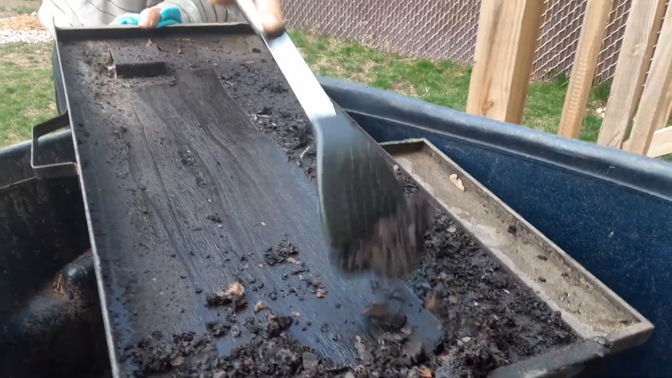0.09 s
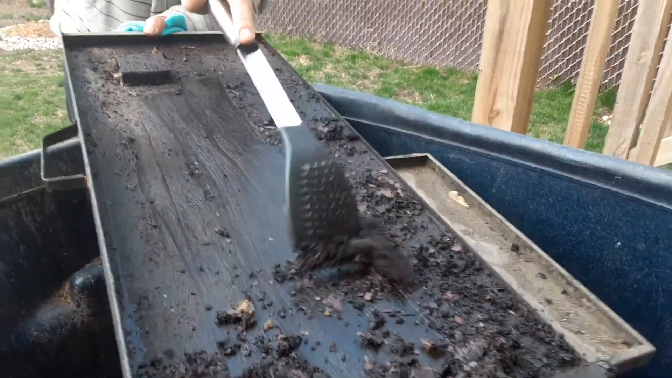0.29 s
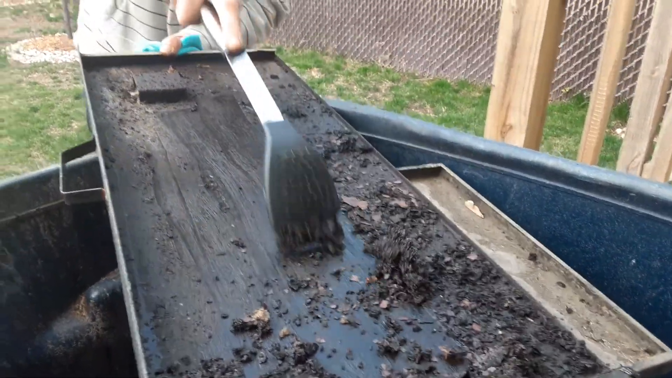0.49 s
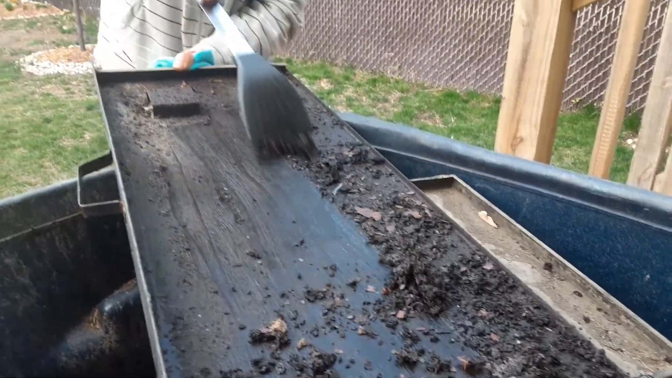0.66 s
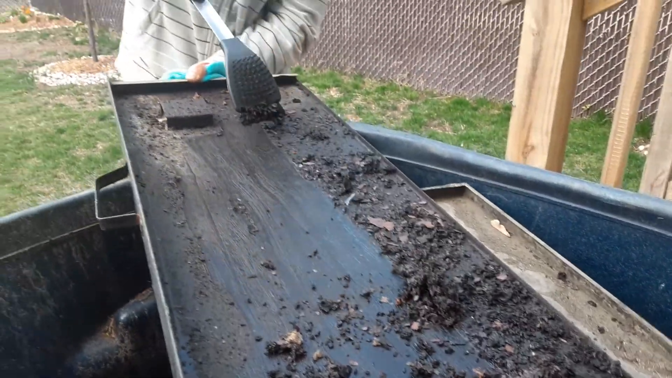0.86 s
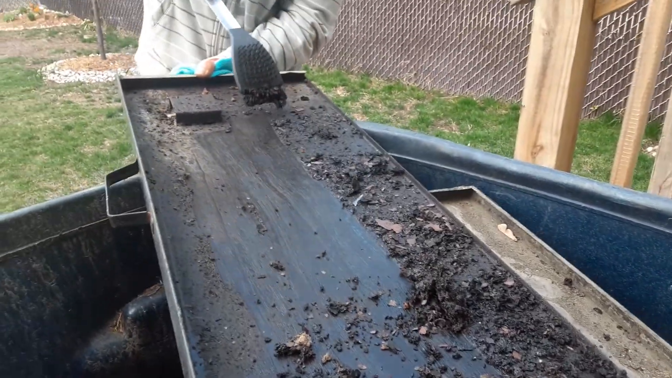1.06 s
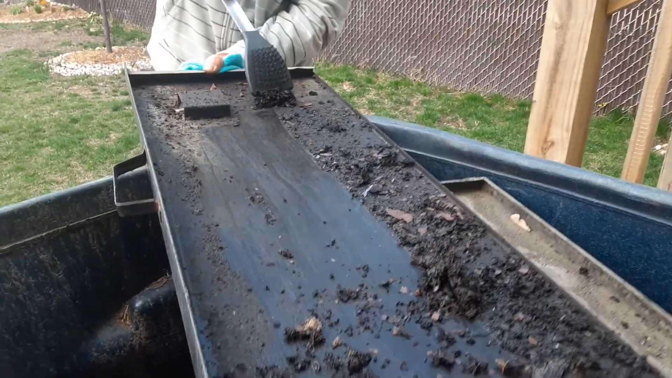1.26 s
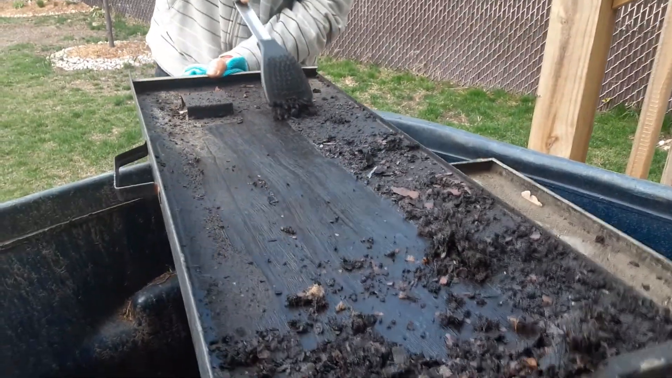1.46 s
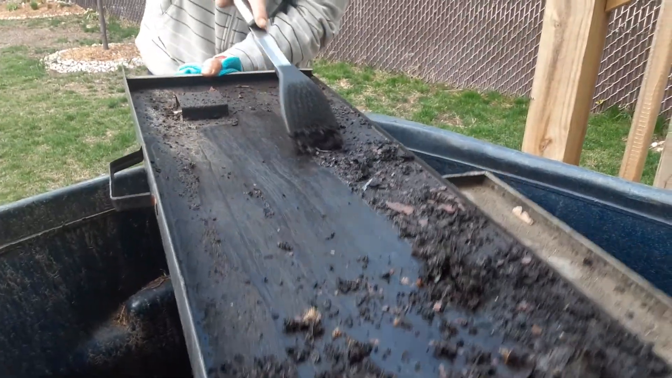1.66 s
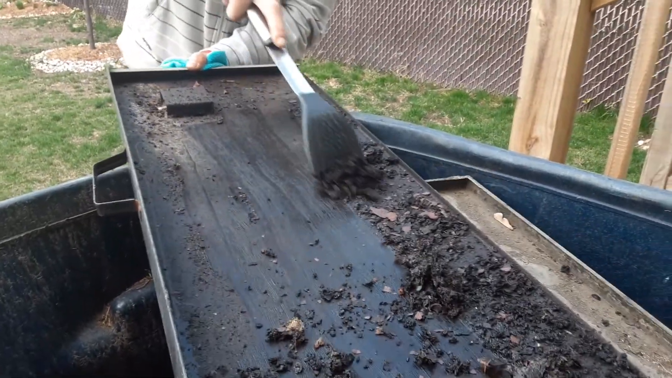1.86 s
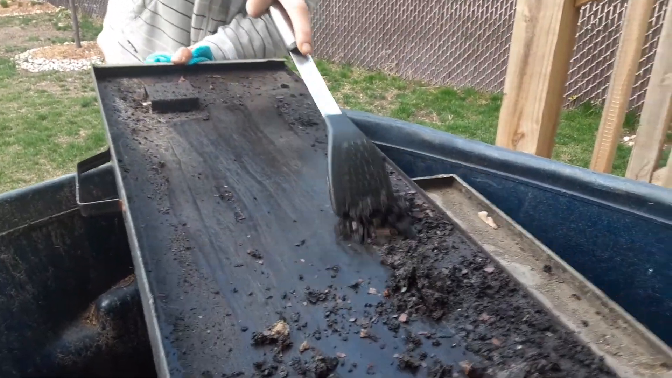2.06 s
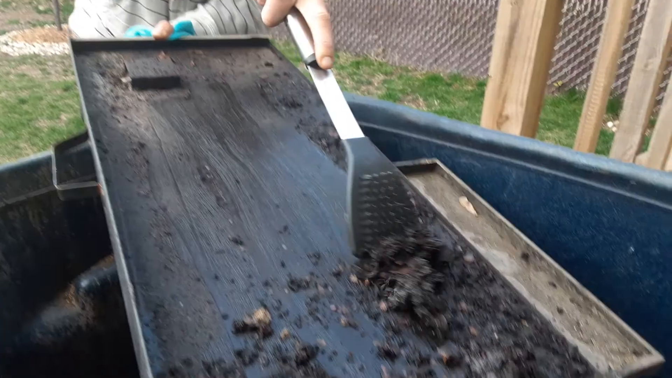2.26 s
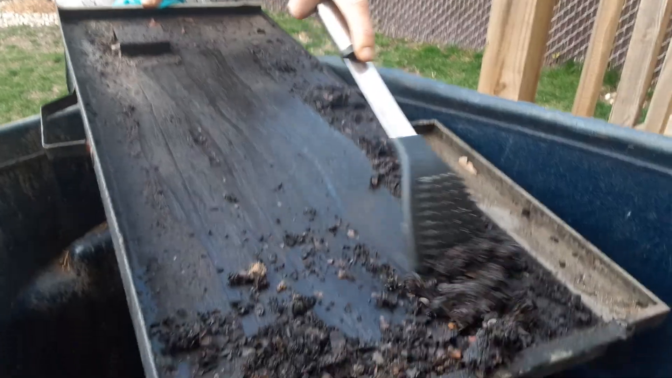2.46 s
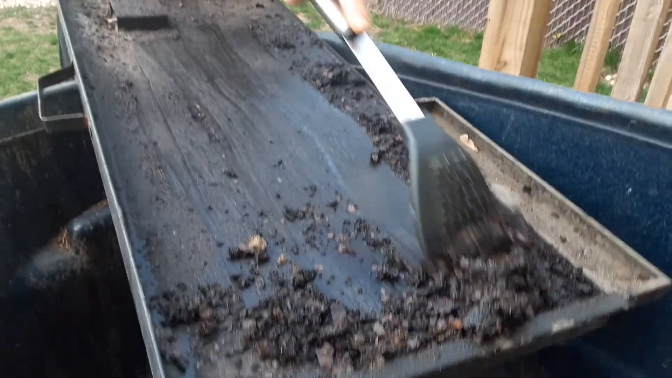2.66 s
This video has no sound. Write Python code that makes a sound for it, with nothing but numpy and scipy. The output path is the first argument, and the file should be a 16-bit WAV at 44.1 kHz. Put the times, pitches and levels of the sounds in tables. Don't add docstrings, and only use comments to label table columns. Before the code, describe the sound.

Metal tray scraping, close up outdoors: a short flick ends in a loud hollow clatter, crumbs patter and fade, then a harsh gritty drag grows toward the microphone, with ticks, dull knocks and sliding crumbs.

```python
import sys
import numpy as np
from scipy import signal
from scipy.fft import rfft, irfft, next_fast_len
from scipy.io import wavfile
from scipy.ndimage import uniform_filter1d, map_coordinates

SR = 44100
rng = np.random.default_rng(int(sys.argv[2]) if len(sys.argv) > 2 else 0)


def unload_wav(signal):
    wavfile.write(
        sys.argv[1],
        SR,
        np.round(np.clip(np.atleast_2d(signal).T, -1, 1) * 32767).astype(np.int16),
    )


def gain_from_db(level_db):
    decades = np.asarray(level_db, float) / 20
    return 10 ** decades


N = 119070
TIME = np.arange(N) / SR


def unit(x):
    return x / np.sqrt(np.mean(x ** 2) + 1e-20)


def along(points, hz):
    f, value = np.transpose(points)
    return np.interp(np.log(hz + 1), np.log(f + 1), value)


def filtered(x, response):
    m = next_fast_len(x.shape[-1] + SR // 4)
    spectrum = rfft(x, m) * response(np.fft.rfftfreq(m, 1 / SR))
    return irfft(spectrum, m)[..., :x.shape[-1]]


def wobble(rate):
    knots = rng.standard_normal(int(N * rate / SR) + 4)
    return map_coordinates(knots, [np.arange(N) * rate / SR])


def grains(rate, size_db, bed):
    hit = rng.random((2, N)) < rate / SR
    size = rng.standard_normal(N) * gain_from_db(size_db * rng.exponential(size=N))
    return unit(bed * rng.standard_normal((2, N)) + unit(hit * size))


def bursts(rows):
    total = np.zeros(N)
    for start, db, rise, t60 in rows:
        since = TIME - start
        fade_db = -60 * np.maximum(since - rise, 0) / t60
        total += gain_from_db(db + fade_db) * np.clip(since / rise, 0, 1)
    return total


# frequency in Hz, likeness from 0 to 1.
LIKENESS = [(60, .4), (130, .55), (290, .8), (640, .75), (1410, .15), (3100, 0), (15000, 0)]


def spread(pair, spectrum):
    def response(hz):
        turn = np.arccos(np.clip(along(LIKENESS, hz), -1, 1)) / 2
        return gain_from_db(along(spectrum, hz)) * [np.cos(turn), np.sin(turn)]

    mid, side = filtered(pair, response)
    return np.array([mid + side, mid - side])


# frequency in Hz, level in dB, time to fade by 60 dB in seconds.
FREE_TONES = [(80, -6, .55), (189, -5, .3), (212, -1, .33), (229, 2, .36), (307, 5, .36), (431, -3, .36),
              (467, -2, .36), (548, -4, .32), (615, -8, .36), (724, -6, .36), (794, -9, .33),
              (850, -11, .3), (992, -13, .3), (1216, -17, .2)]
# frequency in Hz, time to fade by 60 dB in seconds.
RING_TIME = [(60, 1), (300, 0.48), (1000, 0.44), (3000, 0.4), (10000, 0.11)]
# frequency in Hz, level in dB per Hz.
BANG_COLOUR = [(45, -43), (80, -8.5), (125, -16.5), (230, -4), (330, -5), (550, -6), (1000, -9),
               (2000, -27), (6000, -17)]


def tray(spectrum, share, clear_db, tones=FREE_TONES):
    length = SR // 2
    hz, t, noise = signal.stft(rng.standard_normal((2, length)), SR, nperseg=256)
    fading = gain_from_db(-60 * t / (share * along(RING_TIME, hz)[:, None]))
    dense = signal.istft(noise * fading, SR, nperseg=256)[1][:, :length]
    t = np.arange(length) / SR
    f, db, t60 = np.transpose(tones)[:, :, None]
    level_db = db - along(BANG_COLOUR, f) + rng.normal(0, 1.93, f.shape) - 60 * t / (share * t60)
    clear = (gain_from_db(level_db) * np.sin(2 * np.pi * f * t)).sum(axis=0)
    both = dense + gain_from_db(clear_db - 23.5) * clear * [[1], [.35]]
    answer = spread(both, spectrum) * np.minimum(t / 0.0004, 1)
    return answer / np.linalg.norm(answer[0])


# frequency in Hz, level in dB per Hz.
AIR_COLOUR = [(30, -10), (80, 7.5), (135, 7.5), (340, -8.5), (830, -18), (2800, -27), (8500, -60),
              (16400, -66)]


def garden_air():
    noise = unit(spread(rng.standard_normal((2, N)), AIR_COLOUR))
    return gain_from_db(-54 + 1.5 * wobble(7.0)) * noise


# frequency in Hz, width in Hz, level in dB.
BLADE_RING = [(1710, 17, 4), (4840, 170, -11)]
# frequency in Hz, level in dB per Hz.
FAR_HISS = [(900, -8), (1500, -0.5), (2260, -3.5), (5230, -3), (8500, -11.5), (11500, -6.5), (16000, -10.5)]
# frequency in Hz, level in dB per Hz.
NEAR_HISS = [(900, -1.5), (1500, -1), (2260, -3), (5230, -1.5), (9700, -9), (11500, -4.5), (16000, -13)]


def friction_hiss(place, level):
    def ring(hz):
        return 1 + sum(gain_from_db(db) * 1j * hz * width / (centre * centre - hz * hz + 1j * hz * width)
                       for centre, width, db in BLADE_RING)

    slips = grains(2500, 2.62, bed=2.16)
    tilt = np.clip(3.0 * place, 0, 1)
    hiss = (1 - tilt) * spread(slips, FAR_HISS) + tilt * spread(slips, NEAR_HISS)
    z = signal.stft(filtered(hiss, ring), nperseg=256)[2]
    patches = uniform_filter1d(rng.standard_normal(z.shape[1:]), size=14, axis=0)
    patches = unit(uniform_filter1d(patches, size=4, axis=1))
    return unit(signal.istft(z * gain_from_db(1.5 * patches), nperseg=256)[1][:, :N]) * level


# frequency in Hz, level in dB, time to fade by 60 dB in seconds.
PRESSED_TONES = [(78.7, 1, 0.41), (202, -10, 1), (319.5, -3, 1), (468, -6, 0.99), (604.6, -9, 0.19),
                 (684, 4.5, 0.1), (801, -13, .3), (997, -2, 0.52), (1675, -24, 0.2)]
# frequency in Hz, level in dB per Hz.
FAR_DRUM = [(45, -46), (82, 1.5), (140, -8), (205, 0), (270, -7), (500, -3), (1100, -8.5), (2500, -27),
            (6000, -28.5)]
# frequency in Hz, level in dB per Hz.
NEAR_DRUM = [(45, -52), (90, -14), (210, -7), (330, -11), (480, 0), (900, -4), (1700, -14), (6000, -35)]
FAR_S, NEAR_S = 1.5, 2.5
DAMPED = 0.45


def drumming(place, level):
    spot_s = .17
    force = grains(600, 0.98, bed=1.54)[0] * level * gain_from_db(0.18 * wobble(30.2))
    out = np.zeros((2, N))
    for s in np.arange(0, N / SR + spot_s, spot_s):
        a = max(round((s - spot_s) * SR), 0)
        b = min(round((s + spot_s) * SR), N)
        near = place[min(round(s * SR), N - 1)]
        tones = np.array(PRESSED_TONES)
        tones[:, 0] *= 1 + .02 * rng.standard_normal(len(tones))
        spot = np.zeros((2, SR // 2))
        for colour, share in [(FAR_DRUM, 1 - near), (NEAR_DRUM, near)]:
            if share > 0:
                spot += np.sqrt(share) * tray(colour, DAMPED, -3.5, tones)
        push = force[a:b] * np.cos(np.pi / 2 * (TIME[a:b] - s) / spot_s)
        part = signal.fftconvolve(push[None], spot, axes=1)[:, :N - a]
        out[:, a:a + part.shape[1]] += part
    return out


# time in seconds, hiss level in dB, drumming above the hiss in dB.
FIRST_FLICK = [
    (0, -54.5, 25.5),
    (0.019, -47, 6.5),
    (.05, -58.5, 8.5),
    (.075, -61.5, 8),
    (0.101, -61.5, 8.5),
    (.16, -54, 4.5),
    (.21, -56, 6.5),
    (.228, -55, -26),
]
# time in seconds, hiss level in dB, drumming above the hiss in dB.
LONG_STROKE = [(1.291, -60, 10.5), (1.352, -39.5, 4), (1.42, -36.5, -1), (1.6, -34, -2.5),
               (1.69, -35.5, -0.5), (1.75, -33.5, -9), (1.84, -31.5, -9), (1.93, -31, -8), (2.03, -36.5, 2),
               (2.17, -33, -3), (2.27, -30, 1), (2.318, -29.5, 0), (2.36, -35, 3), (2.41, -28.5, -6.5),
               (2.441, -38.5, 2), (2.562, -39, 5), (2.61, -46, 4.5), (2.651, -61.5, 5.5)]


def blade():
    rows = np.array(FIRST_FLICK + [(.24, -54, 11), (1.22, -83.5, 16)] + LONG_STROKE + [(2.7, -63.5, 13.4)])
    hiss_db, drum_db = [np.interp(TIME, rows[:, 0], column) for column in rows.T[1:]]
    place = np.clip((TIME - FAR_S) / (NEAR_S - FAR_S), 0, 1)
    judder_db = .8 * wobble(11) + 0.62 * wobble(120) + 0.54 * np.maximum(wobble(85), 0) ** 2
    return friction_hiss(place, gain_from_db(hiss_db + judder_db)) + drumming(place, gain_from_db(hiss_db + drum_db))


# start in seconds, level in dB.
EDGE_CATCHES = [(.026, -66), (0.185, -49), (.2104, -52), (0.434, -37.5), (0.743, -40.5), (1.1636, -47.5),
                (1.306, -48), (1.327, -48), (1.344, -39), (1.369, -32), (1.384, -33), (1.408, -51),
                (1.438, -38.5), (1.471, -38), (1.48, -35), (1.514, -36), (1.526, -36.5), (1.605, -29),
                (1.64, -38), (1.947, -35.5), (2.051, -34), (2.062, -26.5), (2.109, -24), (2.138, -28),
                (2.173, -36), (2.243, -25.5), (2.477, -29), (2.671, -47)]
# frequency in Hz, level in dB per Hz.
TICK_COLOUR = [(900, -21), (1700, 4), (2500, -7), (5000, -2.5), (9000, -2), (16500, -1)]


def edge_ticks():
    rise_s, t60_s = .001, 0.065
    noise = unit(spread(grains(7100, 0.89, bed=0.67), TICK_COLOUR))
    return noise * bursts([(s, db, rise_s, t60_s) for s, db in EDGE_CATCHES])


# start in seconds, level in dB, rattle length in seconds, hardness in Hz.
BLOWS = [(.232, -16, 0.0006, 2520), (.247, -22.5, 0.019, 2500), (.262, -20, 0.024, 720),
         (0.287, -23.5, .015, 1800), (.325, -37, 0.011, 1500), (0.4348, -25.5, 0.0024, 2530),
         (0.448, -28, 0.014, 352), (0.552, -41, 0.025, 302), (0.605, -39, 0.032, 127.5),
         (1.164, -48, 0.0032, 2500), (1.178, -42.5, 0.0061, 109), (1.66, -39, 0.034, 118.4),
         (1.718, -31.5, 0.011, 830), (1.741, -37.5, .012, 450), (1.772, -34, 0.0045, 235),
         (1.798, -41, 0.065, 89), (1.957, -47, 0.049, 112), (2.204, -48.5, 0.0097, 900),
         (2.258, -27.5, 0.073, 2550), (2.552, -43, 0.025, 1520)]
# frequency in Hz, level in dB per Hz.
RIM_COLOUR = [(45, -29), (85, 0), (140, -6.5), (220, -5.5), (500, -2.5), (800, -5.5), (1700, -17),
              (6000, -31)]


def knocks():
    bounce_s, tones_db = .4, 1
    out, t = np.zeros((2, N + SR)), np.arange(SR // 5) / SR
    for s, db, length, hz in BLOWS:
        contacts = rng.standard_normal(len(t)) * np.exp(-(t / length) ** 2) / np.sqrt(length * SR)
        rattle = 0.83 * contacts + 0.86 * (t == 0)
        soft = signal.lfilter(*signal.butter(2, min(hz, 9000), fs=SR), rattle)
        if s < bounce_s:
            spot = tray(BANG_COLOUR, 1, tones_db)
        elif s < FAR_S:
            spot = tray(RIM_COLOUR, 0.78, tones_db)
        else:
            colour = RIM_COLOUR if s < (FAR_S + NEAR_S) / 2 else NEAR_DRUM
            spot = tray(colour, DAMPED, tones_db, PRESSED_TONES)
        ring = signal.fftconvolve(soft[None], spot, axes=1)
        loudness = np.sqrt(np.mean(ring[:, :SR // 20] ** 2))
        out[:, round(s * SR):][:, :ring.shape[1]] += gain_from_db(db) * ring / loudness
    return out[:, :N]


# start in seconds, level in dB, rise in seconds, time to fade by 60 dB in seconds.
SLIDES = [
    (.233, -18.5, 0.00077, 0.19),
    (.245, -32.5, 0.035, 0.21),
    (0.433, -37.5, 0.0017, 0.31),
    (.49, -49.5, 0.035, 0.13),
    (.695, -53.5, 0.0031, 0.062),
    (.93, -61, 0.0023, 0.026),
    (2.255, -27, 0.018, 0.33),
    (2.385, -31.5, 0.017, 0.21),
]
# frequency in Hz, level in dB per Hz.
CRUMB_COLOUR = [(900, -5.5), (1700, 1.5), (2450, -13), (3000, 0.5), (5280, -4), (6600, -9), (11500, -11.5),
                (16500, -21)]


def crumb_slides():
    noise = unit(spread(grains(3000, 0.66, bed=0.64), CRUMB_COLOUR))
    return noise * bursts(SLIDES) * gain_from_db(0.17 * wobble(90))


# time in seconds, level in dB.
BRUSHING = [
    (.54, -62),
    (.68, -60),
    (.8, -62),
    (.98, -94),
    (1.005, -85),
    (1.011, -63),
    (1.089, -59.5),
    (1.15, -61.5),
    (1.3, -57),
]
# frequency in Hz, level in dB per Hz.
DUST_COLOUR = [(1200, 5), (1800, 6), (3600, 2), (4800, 7), (5800, 1), (6800, -4), (16400, -10)]


def brushed_crumbs():
    level_db = np.interp(TIME, *np.transpose(BRUSHING), left=-120, right=-120) + 1.97 * wobble(40.97)
    return unit(spread(grains(2000, 0.93, bed=2.0), DUST_COLOUR)) * gain_from_db(level_db)


def scene():
    return garden_air() + blade() + edge_ticks() + knocks() + crumb_slides() + brushed_crumbs()


def low_pass(x):
    return signal.sosfilt(signal.butter(12, 16490, fs=SR, output="sos"), x)


# frequency in Hz, difference in dB.
PORT_BALANCE = [(50, 8), (170, 16), (300, 9), (470, 2), (1200, 3), (3300, -10), (6500, -28), (11500, -20)]
# frequency in Hz, level in dB.
TREBLE_SHAPE = [(7000, 0), (9600, -3), (11500, 1), (14000, 0), (15720, 1), (15880, -75)]


def record(dry):
    side = np.array([[1], [-1]])
    lag_s, low_cut_hz, hiss_db = 0.000097, 48, -90

    def mic(hz):
        return gain_from_db(along(TREBLE_SHAPE, hz))

    def ports(hz):
        balance = 2 / np.sqrt(1 + gain_from_db(-2 * side * along(PORT_BALANCE, hz)))
        delay = np.exp(-1j * np.pi * hz * lag_s * side)
        low_cut = (1j * hz / (low_cut_hz + 1j * hz)) ** 2
        return balance * delay * mic(hz) * low_cut

    x = filtered(dry, ports)
    since = (np.arange(N) - np.argmax(np.abs(x[0]) > .2)) / SR

    def dip(share, recovery_s):
        onset = np.clip(1 + since / 0.0066, 0, 1)
        return 1 - share * onset * np.exp(-np.maximum(since, 0) / recovery_s)

    duck = dip(.9, .022) * dip(0.64, 0.03)
    hiss = gain_from_db(hiss_db) * filtered(rng.standard_normal((2, N)), mic)
    x = x * np.array([np.ones(N), duck]) + hiss
    mix = x / (1 + np.abs(x) ** 6) ** (1 / 6)
    return low_pass(mix)


dry = scene()
out = record(dry)
unload_wav(out)
```